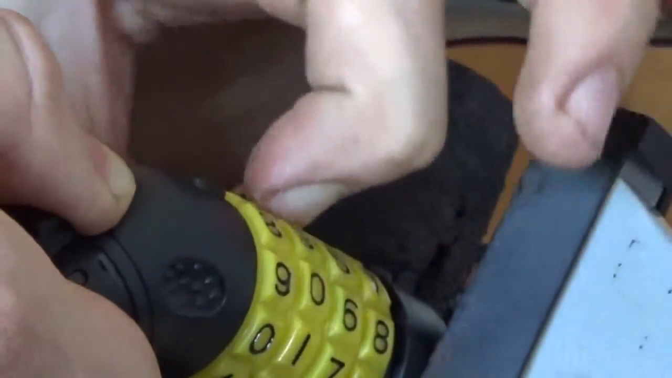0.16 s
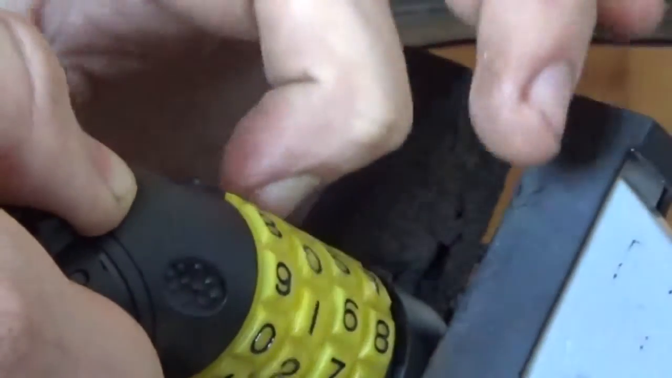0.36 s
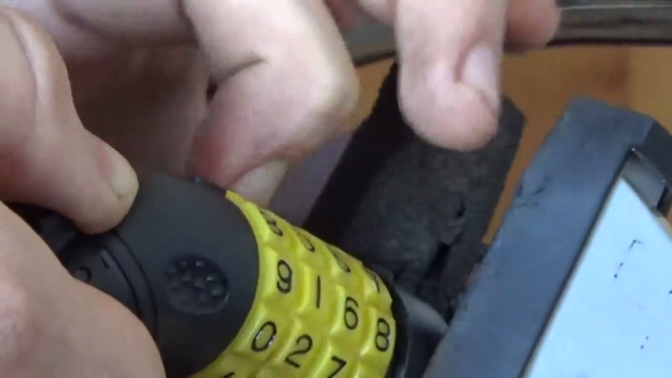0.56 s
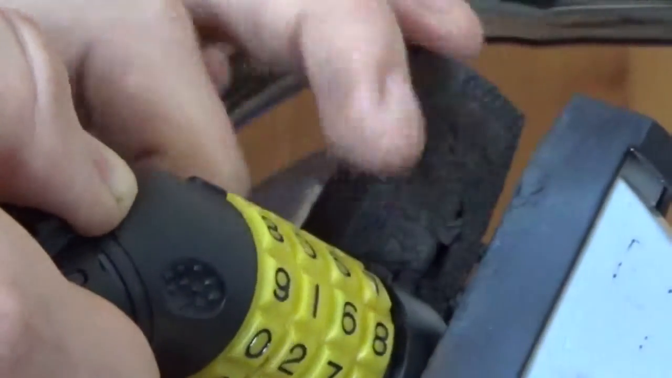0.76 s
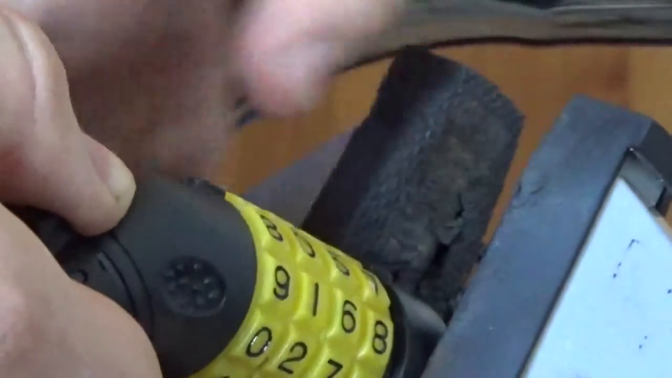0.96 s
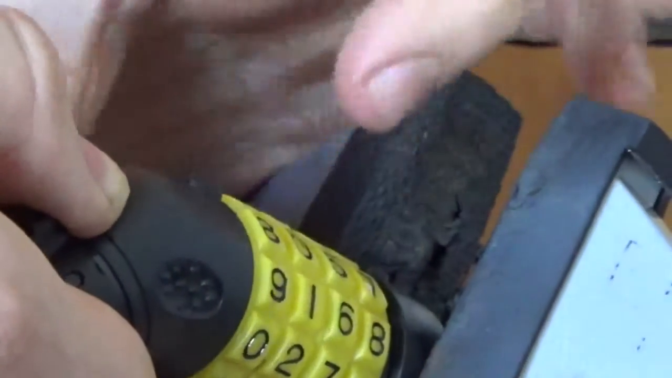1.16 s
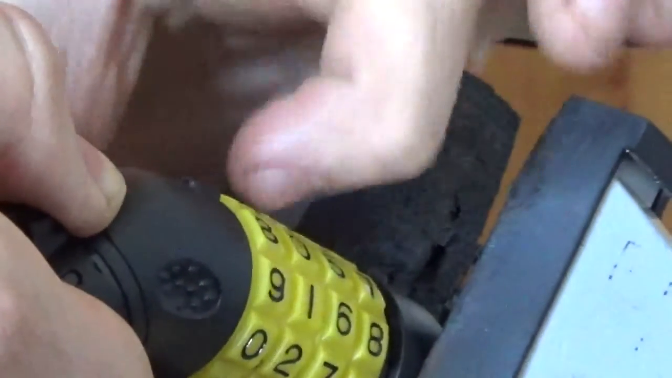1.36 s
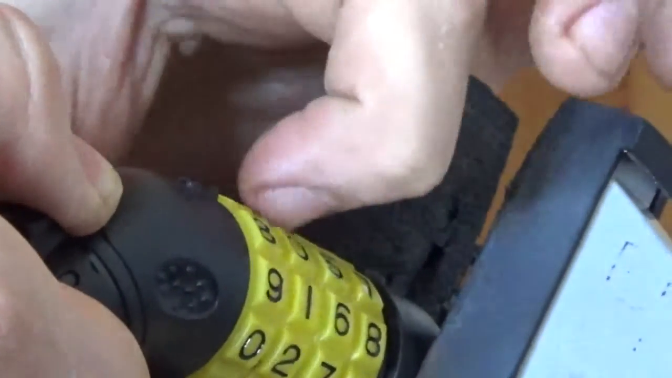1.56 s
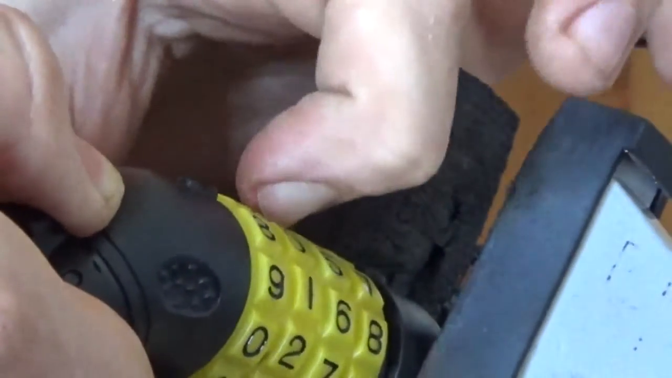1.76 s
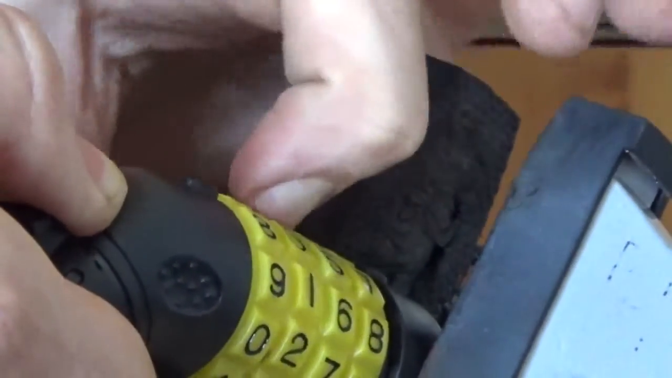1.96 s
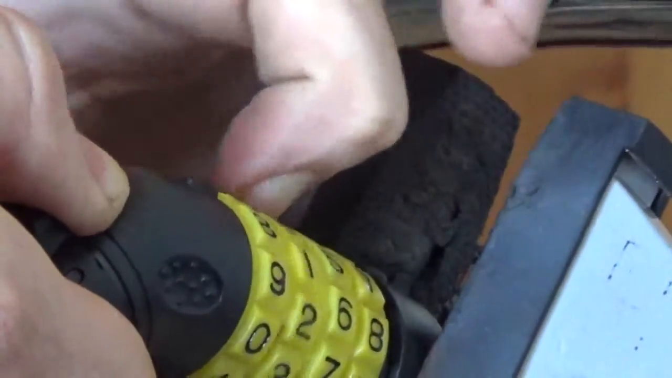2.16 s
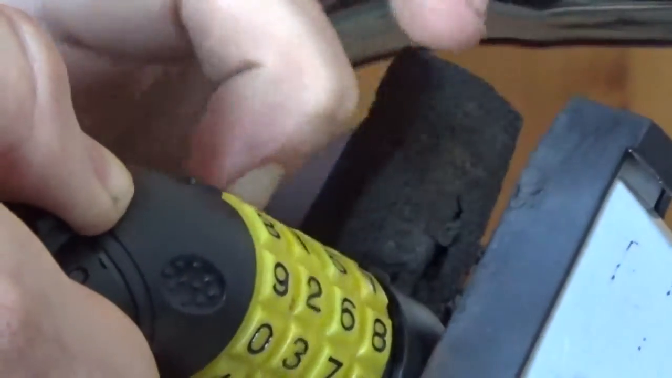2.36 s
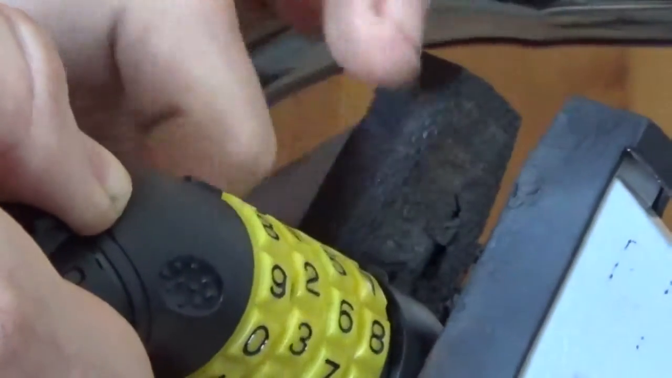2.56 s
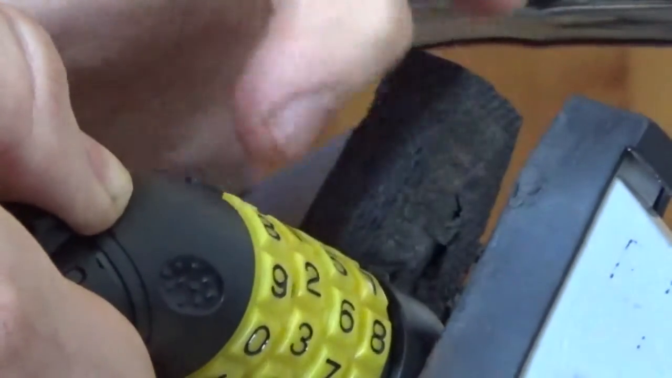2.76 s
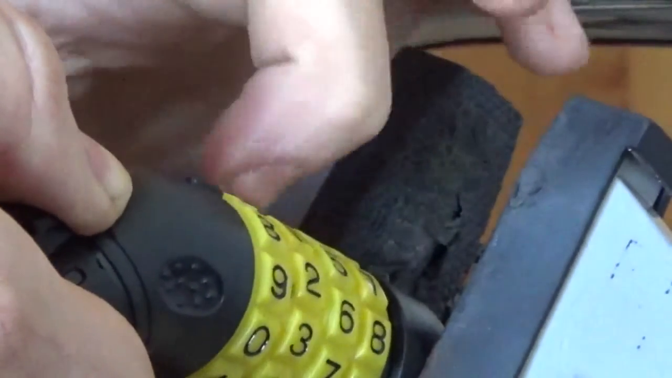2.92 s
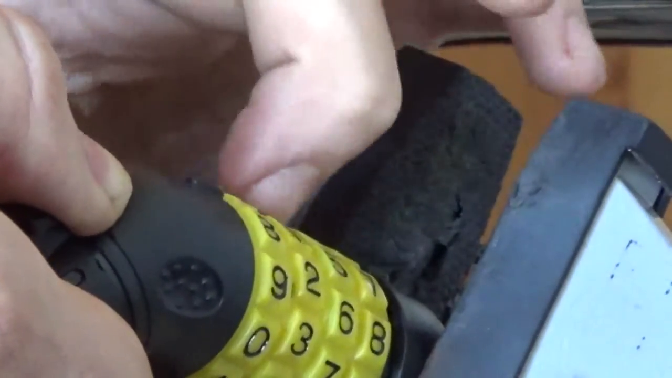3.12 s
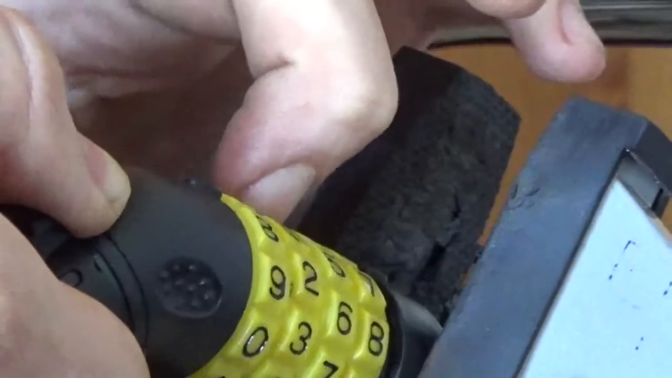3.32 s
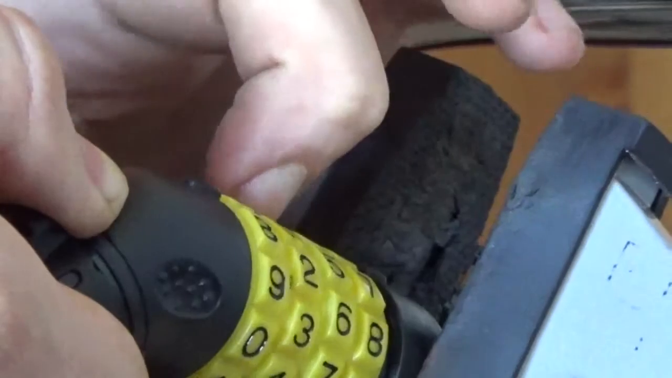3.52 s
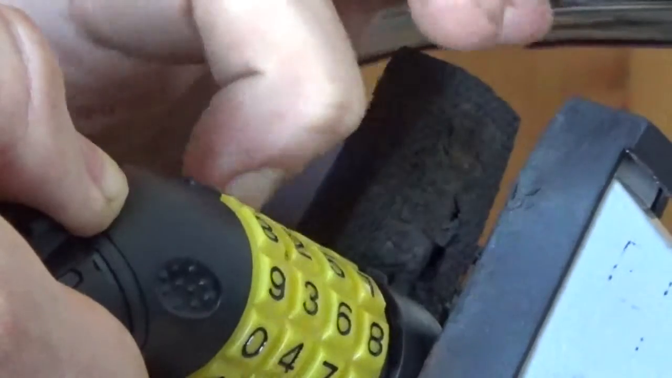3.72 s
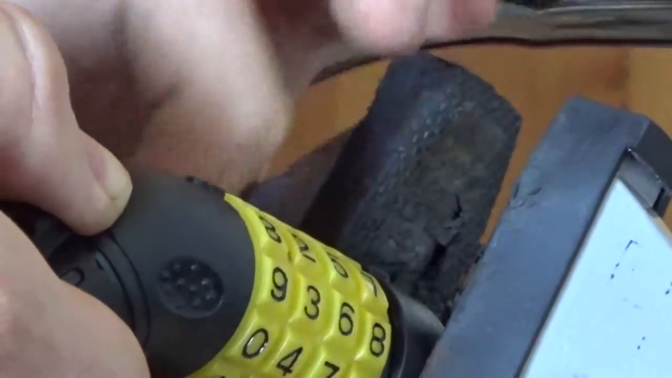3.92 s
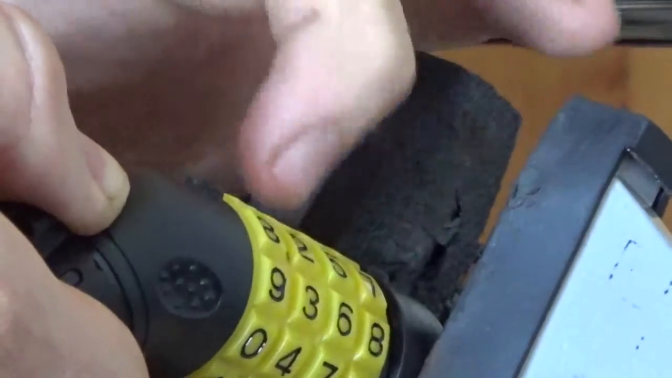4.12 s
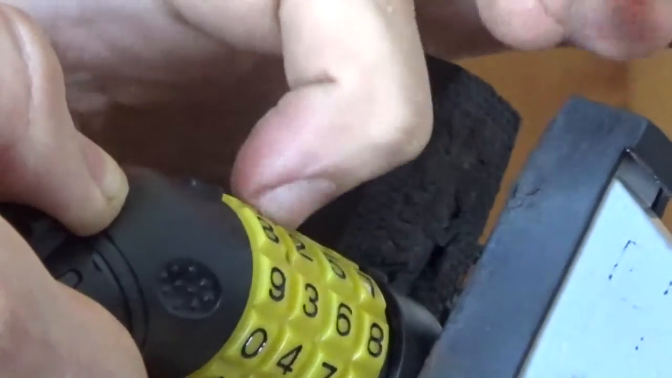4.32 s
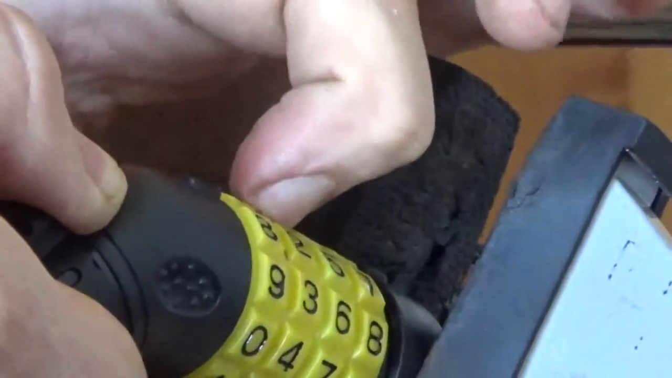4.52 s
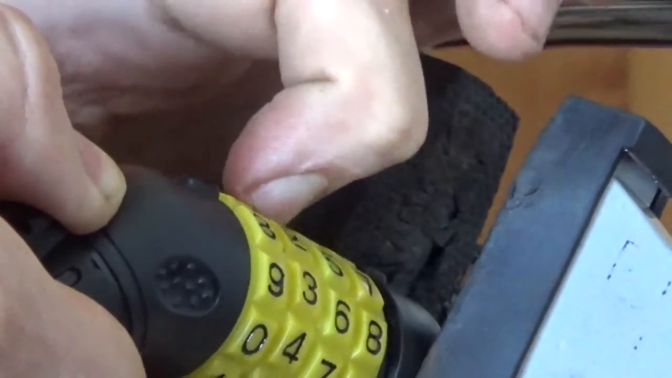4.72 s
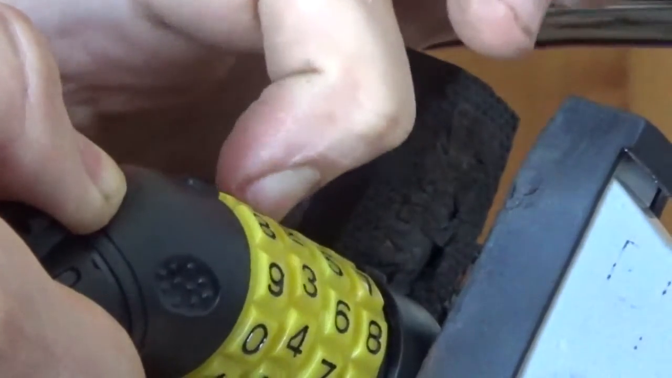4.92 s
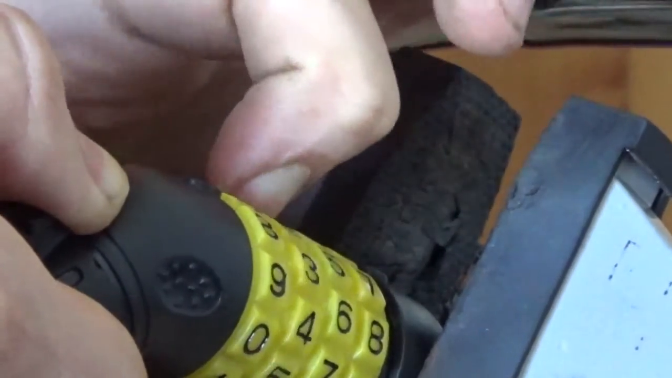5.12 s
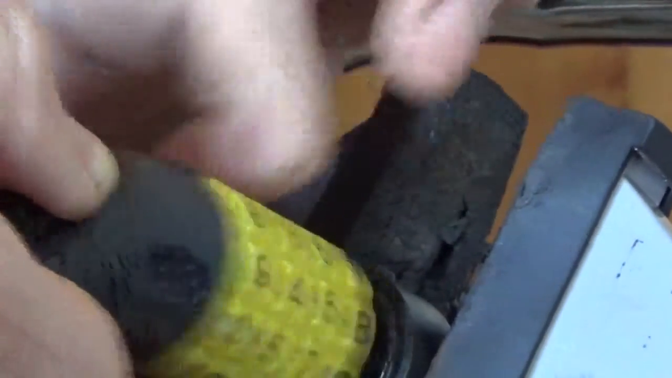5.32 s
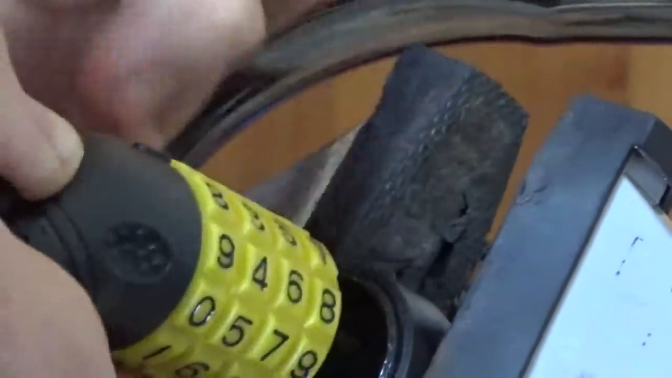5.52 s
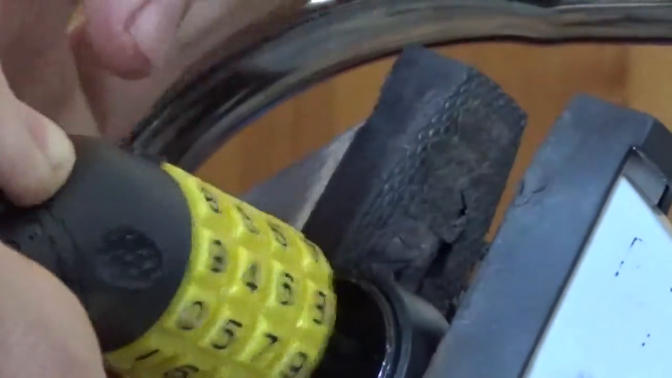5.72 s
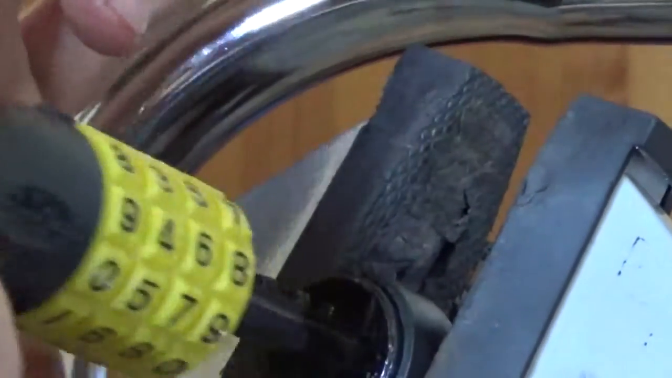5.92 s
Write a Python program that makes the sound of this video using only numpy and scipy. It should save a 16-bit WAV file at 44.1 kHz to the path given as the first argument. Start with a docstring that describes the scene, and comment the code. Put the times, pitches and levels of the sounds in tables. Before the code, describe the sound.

A cable lock held in a vice is handled very close to stereo microphones in a small, dry room. A low wavering hum, soft hiss and a faint, fast camera chirr run throughout. Light ticks at 0.2 to 0.35 seconds lead to a crisp plastic click near 0.6 and a brighter, metallic double snap near 0.68. Weaker clicks follow around 1.4 to 1.5, then another group at 2.3 to 2.6, strongest at 2.46. After soft fingertip bumps around 3.2, a sharp clack lands at 3.8. From 4 to 5.2 only faint dull pats remain. At 5.32 the lock springs open with several rapid, much louder clacks and a low thud. Until the end at about 6 seconds, the toothed pin scrapes and rattles irregularly, with a hollow knock near 5.52 and strong clacks at 5.66 and 5.77, over handling rumble.

```python
"""Low hum, hiss and a faint camera chirring run throughout in a small dry room, under a cable lock close by.
The lock sits in a vice; a finger turns its plastic number wheels, which snap into their detents.
Then it springs open and its toothed pin rattles out of the barrel. Blows and slips excite decaying modes,
rough cracks and short diffuse tails; filtered noise and sines make the room, tiny sine whistles the chirring."""
import sys
import numpy as np
from scipy import signal
from scipy.fft import rfft, irfft
from scipy.io import wavfile

SR = 44100
rng = np.random.default_rng(int(sys.argv[2]) if len(sys.argv) > 2 else 0)


def pcm_store(signal):
    """Save signal as 16-bit PCM."""
    levels = np.round(np.clip(np.atleast_2d(signal), -1, 1) * 32767)
    wavfile.write(sys.argv[1], SR, levels.astype(np.int16).T)


N = 268039
TIME = np.arange(N) / SR  # seconds
RING_T = np.arange(SR // 3) / SR  # seconds; no ring or tail lasts longer
OPEN_S = 5.32  # the lock gives way, and from then on the pin slides freely

# Modes of the clamped mount, the barrel, a plastic wheel and its steel detent.
# Each row: frequency in Hz, relative level in dB, 60 dB decay time in seconds.
MOUNT_MODES = [(87.5, -3.5, 0.28), (151.2, 0.5, 0.21), (214, -2.5, 0.16), (224.6, -3.5, 0.25),
               (269, -25, 0.057), (345.2, -3.5, 0.14), (450, -21, 0.068)]
BARREL_MODES = [(544, -2, 0.078), (674, 2, 0.077), (697.5, -4, 0.18), (728, 5, 0.031), (951, 3.5, 0.019),
                (972, -4, 0.096), (1106, -3, 0.047), (1310, 10, 0.0048)]
WHEEL_MODES = [(1910, -8, 0.033), (3260, -0.5, 0.025), (3800, 1, 0.0079), (4240, 3.5, 0.013),
               (4700, 0, 0.0091), (6200, 1, 0.015)]
DETENT_MODES = [(6670, -5, 0.00064), (8030, -9, 0.02), (8900, 6, 0.005), (9500, 4.5, 0.015),
                (10650, 12.5, 0.012), (10540, -19.5, 0.014)]

# The wheels snapping into their detents and the release; then the toothed pin knocking in its socket.
# Each row: start in seconds, strength in dB, metal edge in dB, weight behind the blow in dB.
SNAP_BLOWS = [(0.2268, -63.5, -6, 13.5), (0.3386, -56.5, 0, -1), (0.5842, -37, -4, -10),
              (0.5881, -47, 10.5, 2), (0.6773, -41.5, 11.5, 4.5), (0.6815, -37, 8.5, 7),
              (1.3823, -46, -7, 5), (1.3868, -49.5, 5, -3), (1.4288, -53.5, 13.5, 3.5), (1.432, -58, 8, -4),
              (1.5098, -48, 0, -3.5), (1.8427, -62, -12, 12.5), (2.285, -48.5, -0.5, -4),
              (2.4583, -35, 0.5, -0.5), (2.6185, -48.5, -15, -0.5), (2.8608, -55, -2.5, 2.5),
              (3.6958, -52.5, 2.5, 7), (3.7998, -33.5, 2.5, -2), (3.9544, -62, 6, -3),
              (5.3215, -38.5, -4, 6.5), (5.3263, -25, 7, -4.5), (5.3556, -22, 2, 2),
              (5.3786, -28, 3.5, 7.5)]
RATTLE_BLOWS = [(5.4361, -38.5, 1, 6), (5.4662, -31.5, -31, 5), (5.4927, -26.5, -12, -8),
                (5.5248, -46.5, 3, 21), (5.5519, -43, 1, 8.5), (5.6102, -55.5, -20, 21),
                (5.658, -22, -16.5, -12), (5.7487, -50.5, -3, 13), (5.7719, -24.5, -4.5, -8.5),
                (5.7773, -37.5, 14.5, -6), (5.7825, -42, 0, 2.5), (5.8422, -44, -15, 9),
                (5.8501, -34, -23, -15), (5.9037, -55, 2, 10), (5.9084, -42, -5.5, -8),
                (5.9335, -33, -27.5, -3), (5.9913, -48, -4, -11), (5.999, -39.5, -20, -8),
                (6.0594, -56, -22, 19.5)]


def undb(db):
    """Decibels to gain."""
    return 10 ** (np.asarray(db) / 20)


def unit(x):
    """Scale to rms 1."""
    return x / np.sqrt(np.mean(x ** 2))


def band(x, lo_hz, hi_hz):
    """Band-pass."""
    edges = [lo_hz, min(hi_hz, .45 * SR)]
    return signal.sosfilt(signal.butter(2, edges, "band", fs=SR, output="sos"), x)


def add(track, s, sound):
    """Mix a sound into both channels at time s."""
    i = max(int(s * SR), 0)
    track[:, i:i + sound.shape[-1]] += sound[..., :max(N - i, 0)]


def fade(t60):
    """Exponential decay by 60 dB in t60 seconds."""
    return np.exp(-np.log(1000) * RING_T / t60)


def sine(hz, t=RING_T):
    """A steady sine tone."""
    return np.sin(2 * np.pi * hz * t)


def spread(mid, side):
    """Left and right from mid and side."""
    return np.array([mid + side, mid - side])


def background():
    """Steady hiss and room air over a wavering hum; the bass is nearly alike in both ears."""
    # Colour of the air. Each row: frequency in Hz, relative level in dB per Hz.
    air_colour = [(20, -16), (50, -10), (95, -6.5), (155, -3.5), (230, -5.5), (400, -10), (700, -12.5),
                  (1600, -18.5), (3000, -18.5), (5000, -22), (10800, -24.5), (13000, -82)]
    # Stereo width of the air. Each row: frequency in Hz, side minus mid in dB.
    air_width = [(60, -14), (110, -15), (190, -10.5), (340, -4), (620, -0.5), (1100, 1), (1980, 0.5),
                 (3540, -3.5), (6330, -6.5), (11300, -10.5)]
    # Hum tones. Each row: frequency in Hz, rms level in dB.
    hum_lines = [(49.5, -66.5), (150.3, -69.5), (210, -78.5)]
    air_db = -61.5  # rms over both channels

    log_hz = np.log(np.maximum(np.arange(N // 2 + 1) * SR / N, 1))
    colour_hz, colour_db = np.transpose(air_colour)
    width_hz, width_db = np.transpose(air_width)
    colour = undb(np.interp(log_hz, np.log(colour_hz), colour_db))
    width = undb(np.interp(log_hz, np.log(width_hz), width_db))
    mid, side = rfft(rng.standard_normal((2, N))) * colour
    air = undb(air_db) * unit(spread(irfft(mid, N), irfft(side * width, N)))

    # a slow random drift of the phase, shared by all hum tones
    waver = np.interp(TIME, np.linspace(0, N / SR, num=40), rng.standard_normal(size=40))
    hum = sum(undb(db) * unit(np.sin(2 * np.pi * hz * TIME + 0.1 * waver)) for hz, db in hum_lines)
    return air + hum


def camera(scatter_db, detune):
    """Faint chirring: a steadily repeating round of tiny whistles, each varying in level and pitch."""
    # One round. Each row: start within the round in seconds, length in seconds, frequency in Hz, peak in dB.
    whistles = [(0.04, 0.0051, 2523, -60), (0.00205, 0.013, 2120, -65.5), (.0095, 0.011, 2770, -66.5),
                (0.014, 0.0076, 2090, -70)]
    rounds_hz = 25

    out = np.zeros((2, N))
    for start in np.arange(0, N / SR, 1 / rounds_hz):
        chance = rng.standard_normal((len(whistles), 2))
        for (s, length, hz, db), (louder, higher) in zip(whistles, chance):
            t = RING_T[:int(length * SR)]
            gain = undb(db + scatter_db * louder) * np.hanning(len(t))
            add(out, start + s, gain * sine(hz * (1 + detune * higher), t))
    return out


def room(x, wet_db, t60):
    """A short diffuse tail; the moving hands make the reflections differ each time."""
    onset_s, side_share = 0.00057, 0.47
    shape = fade(t60) * (1 - np.exp(-RING_T / onset_s))
    mid, side = rng.standard_normal((2, len(RING_T))) * shape / np.linalg.norm(shape)
    tail = signal.fftconvolve(x[None], spread(mid, side_share * side), axes=1)
    return undb(wet_db) * tail[:, :len(x)]


def ring(modes, detune, scatter_db):
    """One blow on a set of modes; where it lands shifts their weights and pitch."""
    chance = rng.standard_normal((len(modes), 2))
    out = np.zeros(len(RING_T))
    for k, ((hz, db, t60), (louder, higher)) in enumerate(zip(modes, chance)):
        sign = (-1) ** k  # neighbouring modes start in opposite directions
        out += sign * undb(db + scatter_db * louder) * fade(t60) * sine(hz * (1 + detune * higher))
    return out


def strikes(blows, modes, lo_hz, hi_hz, attack_s, crack_db, crack_t60, detune, wet_db, room_t60):
    """Blows (s, rms dB of the direct attack): modes plus the crack of a rough contact, in the room."""
    out, n = np.zeros((2, N)), int(attack_s * SR)
    even = unit(band(signal.unit_impulse(len(RING_T)), lo_hz, hi_hz))
    for s, db in blows:
        tone = ring(modes, detune, scatter_db=2.5)
        crack = rng.standard_normal(len(RING_T)) * fade(crack_t60)
        tone, crack = band(np.array([tone, crack]), lo_hz, hi_hz)
        hit = tone / np.std(tone[:n]) + undb(crack_db) * crack / np.std(crack[:n])
        hit = undb(db) * hit / np.std(hit[:n])
        # the room hears the part from all sides, so half of its tail has an even colour
        own_tail = room(hit, wet_db, room_t60)
        even_tail = room(np.std(hit) * even, wet_db, room_t60)
        add(out, s, hit + (own_tail + even_tail) / np.sqrt(2))
    return out


def contacts(rows):
    """Blows (s, dB) where parts meet: the clack, and the tick that a metal edge adds."""
    s, db, edge, _ = np.transpose(rows)
    return np.c_[s, db], np.c_[s, db + edge]


def carried(rows, share_db):
    """Blows (s, dB) that reach a heavy part: more when the hand's weight is behind them."""
    s, db, _, weight = np.transpose(rows)
    return np.c_[s, db + weight + share_db]


def stroke(s, hold_s, attack_s, fall_db_per_s):
    """Gain over time of one push of the hand: it rises, holds and dies away."""
    t = TIME - s
    return np.clip(t / attack_s, 0, 1) * undb(-fall_db_per_s * np.maximum(t - hold_s, 0))


def effort():
    """Gains of scrape and rumble: the hand rests, turns the wheels, then tugs the pin out."""
    # The finger rolling a wheel and letting go. Each row: start in seconds, hold in seconds, rumble in dB.
    turns = [(0.68, 0.52, -62), (2.388, 0.27, -55.5), (2.68, 0.5, -62.5), (3.794, 0.41, -65)]
    # Tugs that drag the pin out of the barrel.
    # Each row: start in seconds, hold in seconds, scrape in dB, rumble in dB.
    tugs = [(5.315, 0.024, -50.5, -38), (5.44, 0.085, -62, -47), (5.774, 0.0071, -50, -39)]
    rest_db, drag_scrape_db, drag_rumble_db = -70, -72.5, -46
    turn_attack_s, turn_fall = 0.085, 51  # fall in dB per second
    tug_attack_s, scrape_fall, rumble_fall = 0.0043, 480, 130  # falls in dB per second

    sliding = stroke(OPEN_S, N / SR, tug_attack_s, rumble_fall)
    scrape = [undb(drag_scrape_db) * sliding]
    rumble = [np.full(N, undb(rest_db)), undb(drag_rumble_db) * sliding]
    for s, hold, db in turns:
        rumble.append(undb(db) * stroke(s, hold, turn_attack_s, turn_fall))
    for s, hold, scrape_db, rumble_db in tugs:
        scrape.append(undb(scrape_db) * stroke(s, hold, tug_attack_s, scrape_fall))
        rumble.append(undb(rumble_db) * stroke(s, hold, tug_attack_s, rumble_fall))
    # the strongest push at any moment sets the gain
    return np.max(scrape, axis=0), np.max(rumble, axis=0)


def rub(modes, lo_hz, hi_hz, per_s, size_db, grit_db):
    """Friction: a dense run of tiny uneven slips, heard through a set of modes and as bare grit."""
    happens = rng.random(N) < per_s / SR
    size = undb(size_db * np.minimum(rng.exponential(size=N), 4))
    slips = happens * rng.standard_normal(N) * size
    rung = signal.fftconvolve(slips, ring(modes, detune=0, scatter_db=0))[:N]
    return unit(unit(rung) + undb(grit_db) * unit(band(slips, lo_hz, hi_hz)))


def handling():
    """The pin scrapes along the wheels while the grip shakes barrel and mount."""
    metal = rub(DETENT_MODES, 8970, 9000, per_s=7200, size_db=-1, grit_db=-9.0)
    plastic = rub(WHEEL_MODES, 1050, 4700, per_s=2500, size_db=1, grit_db=12)
    mount = rub(MOUNT_MODES, 73, 353, per_s=1500, size_db=2.5, grit_db=-0.5)
    barrel = rub(BARREL_MODES, 460, 1440, per_s=1200, size_db=2.5, grit_db=9.0)
    scrape, rumble = effort()
    scraping = scrape * (metal + undb(5) * plastic)
    rumbling = rumble * (undb(-2.0) * mount + undb(-12.5) * barrel)
    rubbing = scraping + rumbling
    return rubbing + room(rubbing, wet_db=-14.0, t60=0.31)


def body():
    """Every contact, hard or soft, shakes the two heavy parts, which always ring at their own pitches."""
    # Soft bumps of the hand on the lock. Each row: start in seconds, strength in dB.
    soft_bumps = [(0.6978, -48), (0.8552, -52), (0.8737, -52), (1.0548, -62), (1.3467, -52),
                  (1.7348, -53.5), (1.9783, -49.5), (2.3658, -48), (2.474, -45), (2.5695, -54.5),
                  (3.1609, -55), (3.1999, -56.5), (3.2973, -60), (3.355, -48.5), (3.966, -57.5),
                  (4.0821, -61), (4.569, -59.5), (4.6804, -60), (4.791, -56), (4.8867, -58)]
    # share_db: how much of a blow reaches the mount (thud) and the barrel (knock)
    thuds = np.vstack([carried(SNAP_BLOWS, share_db=-14), carried(RATTLE_BLOWS, share_db=-20), soft_bumps])
    knocks = np.vstack([carried(SNAP_BLOWS, share_db=-11.5), carried(RATTLE_BLOWS, share_db=-8.5)])
    pats = [(s, db - 4.5) for s, db in soft_bumps]

    thud = strikes(thuds, MOUNT_MODES, 110.4, 605, attack_s=0.0158, crack_db=-2, crack_t60=0.037,
                   detune=0, wet_db=-8.5, room_t60=0.31)
    knock = strikes(knocks, BARREL_MODES, 420, 1600, attack_s=0.0048, crack_db=-7.5, crack_t60=0.0031,
                    detune=0, wet_db=-2.5, room_t60=0.18)
    # a fingertip pushes for longer, so its knock is duller
    pat = strikes(pats, BARREL_MODES, 515, 800, attack_s=0.0052, crack_db=6.5, crack_t60=0.0069,
                  detune=0, wet_db=-4, room_t60=0.21)
    return thud + knock + pat


def after_ring():
    """Spring and lock sing on after every detent; the vice rocks at the release, the pin butts the barrel."""
    # The whole lock, left ringing by a detent with weight behind it.
    # Each row: frequency in Hz, relative level in dB, 60 dB decay time in seconds.
    lock_modes = [(350.7, 1, 0.17), (727, -11, 0.088), (855, -6.5, 0.057), (1025, -5, 0.12)]
    spring_modes = [(10020, -16.5, 0.11)]  # the detent spring: Hz, dB relative to the tick, t60 in seconds
    vice_hz, vice_db, vice_t60 = 90, -38, 0.33
    stop_s, stop_hz, stop_db, stop_t60 = 5.5247, 900, -17.5, 0.016  # one hollow knock

    out = np.zeros((2, N))
    _, ticks = contacts(SNAP_BLOWS)
    for s, db in ticks:
        add(out, s, undb(db) * ring(spring_modes, detune=.008, scatter_db=3))
    for s, db in carried(SNAP_BLOWS, share_db=-9.5):
        add(out, s, undb(db) * ring(lock_modes, detune=0.012, scatter_db=3.0))
    add(out, OPEN_S, undb(vice_db) * fade(vice_t60) * sine(vice_hz))
    add(out, stop_s, undb(stop_db) * fade(stop_t60) * sine(stop_hz))
    return out


def notches():
    """Each clack's strongest ring is brief, and climbs as the wheel is turned further."""
    start_hz, rise_hz_per_s = 2720, 432
    over_clack_db, t60 = 2, 0.0086
    out = np.zeros((2, N))
    clacks, _ = contacts(SNAP_BLOWS)
    for s, db in clacks:
        hz = start_hz + rise_hz_per_s * s
        add(out, s, undb(db + over_clack_db) * fade(t60) * sine(hz))
    return out


def wheels():
    """The plastic wheel clacks as its steel detent drops into the next notch."""
    clacks, ticks = contacts(SNAP_BLOWS)
    clack = strikes(clacks, WHEEL_MODES, 1530, 6070, attack_s=0.0016, crack_db=-5, crack_t60=0.031,
                    detune=0.046, wet_db=-8.5, room_t60=0.19)
    tick = strikes(ticks, DETENT_MODES, 7430, 10100, attack_s=0.0025, crack_db=4.0, crack_t60=0.0089,
                   detune=0.038, wet_db=-8.5, room_t60=0.17)
    return clack + tick


def pin():
    """The freed pin hits the wall of its socket, and its teeth tick on the wheels."""
    # Modes of the socket and of the pin.
    # Each row: frequency in Hz, relative level in dB, 60 dB decay time in seconds.
    socket_modes = [(2050, -17, 0.0057), (2650, -2, 0.0079), (3040, 1.5, 0.0088), (3720, -10, 0.0081),
                    (4640, -4.5, 0.0059), (5650, -10, 0.0024)]
    pin_modes = [(6950, -12, .004), (7900, 6, 0.011), (8750, -4, .005), (9750, -12, 0.0093),
                 (10680, 5, 0.029)]
    clacks, ticks = contacts(RATTLE_BLOWS)
    clack = strikes(clacks, socket_modes, 1700, 5440, attack_s=0.002, crack_db=-7.0, crack_t60=0.02,
                    detune=0.021, wet_db=-8.5, room_t60=0.15)
    tick = strikes(ticks, pin_modes, 7100, 14500, attack_s=0.0014, crack_db=-2.5, crack_t60=0.016,
                   detune=0.0114, wet_db=-5.5, room_t60=0.14)
    return clack + tick


def scene():
    """The lock sits close, a little to the right of the microphones; the socket lies further right."""
    around = background() + camera(scatter_db=2.5, detune=0.0018)
    lock = handling() + body() + after_ring() + notches() + wheels()
    # left and right gains in dB
    barrel_end = lock * undb([[-.7], [-.1]])
    socket_end = pin() * undb([[-1.5], [.4]])
    return around + barrel_end + socket_end


def record(dry):
    """The camera's microphones cut the top of the treble with a steep low-pass."""
    top_hz = 11130
    return signal.sosfiltfilt(signal.ellip(8, .1, 45, top_hz, fs=SR, output="sos"), dry)


dry = scene()
out = record(dry)
pcm_store(out)
```